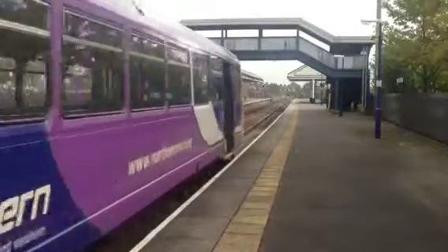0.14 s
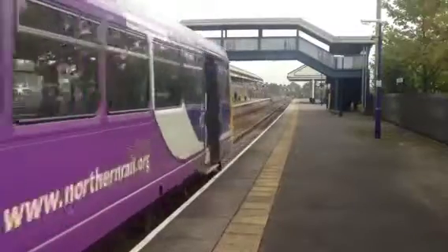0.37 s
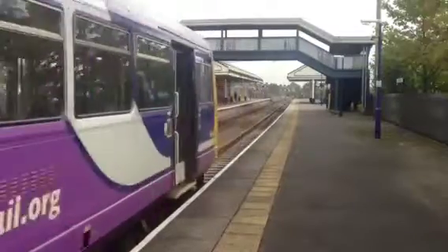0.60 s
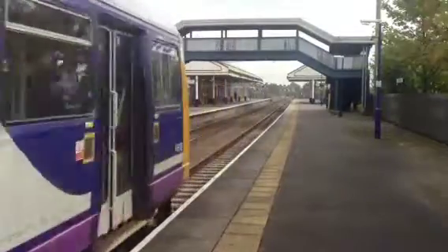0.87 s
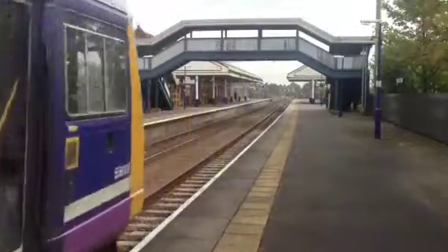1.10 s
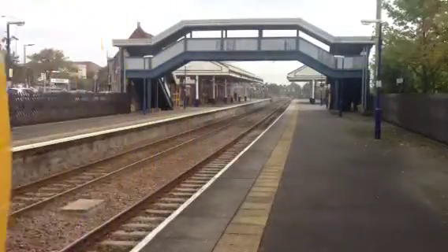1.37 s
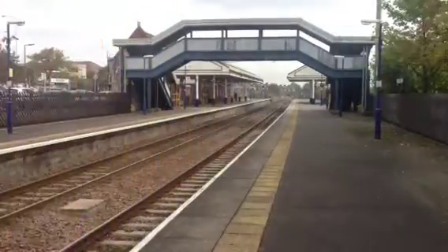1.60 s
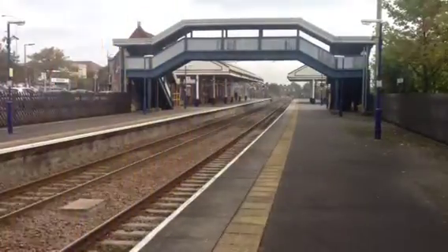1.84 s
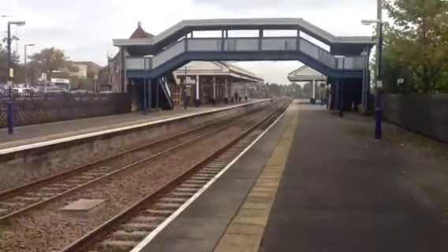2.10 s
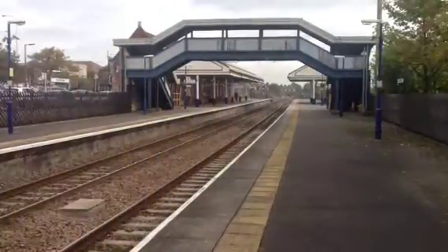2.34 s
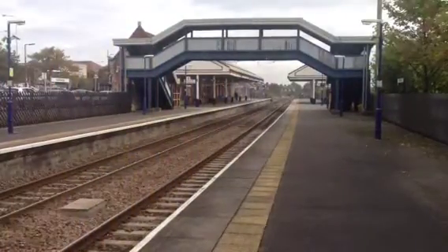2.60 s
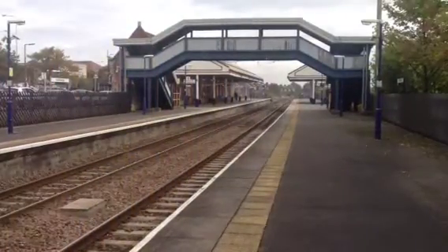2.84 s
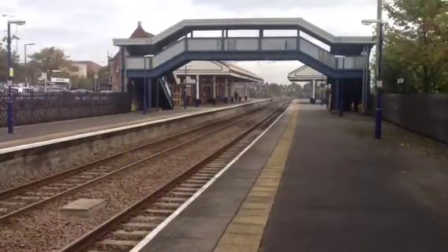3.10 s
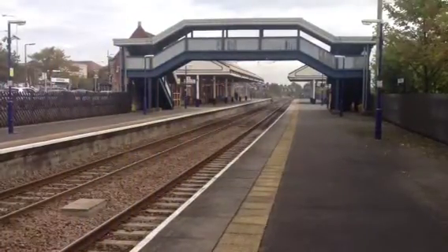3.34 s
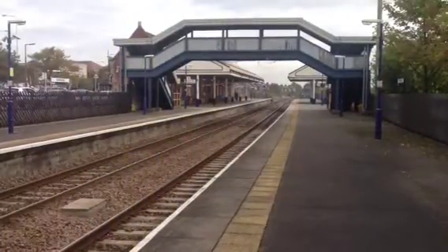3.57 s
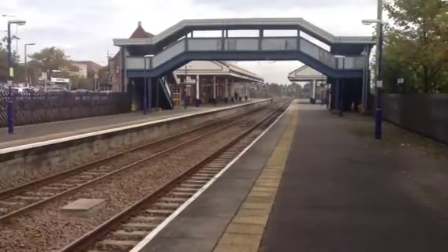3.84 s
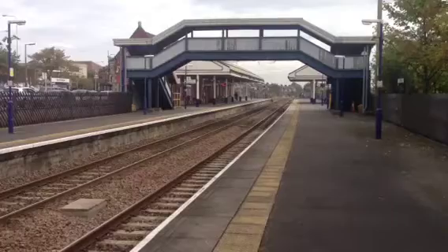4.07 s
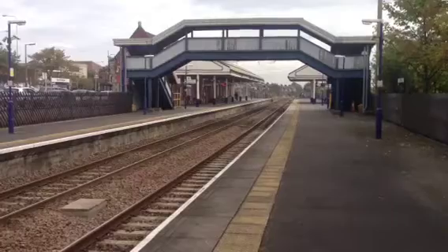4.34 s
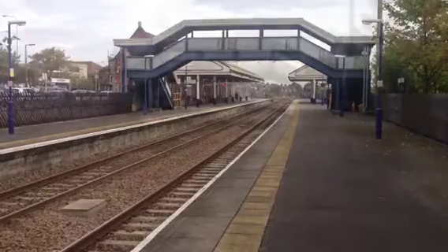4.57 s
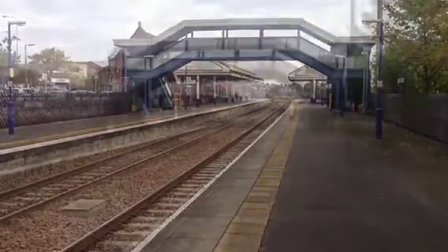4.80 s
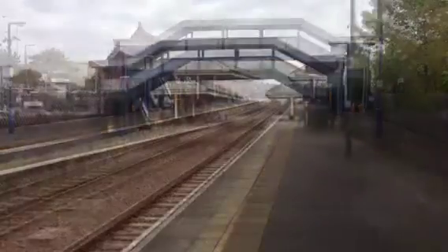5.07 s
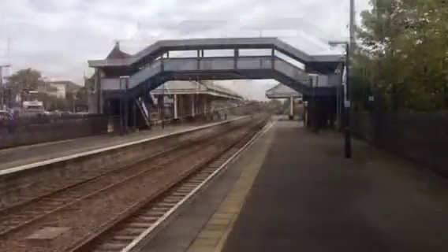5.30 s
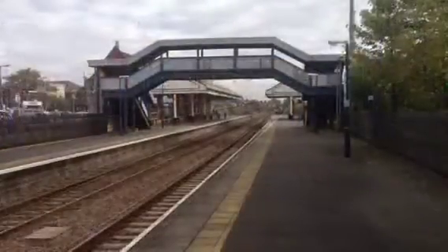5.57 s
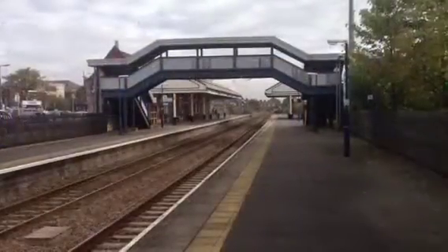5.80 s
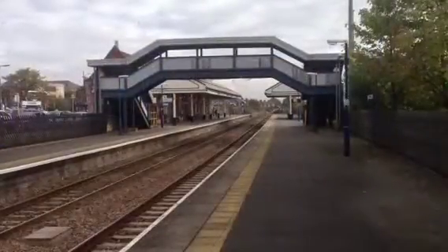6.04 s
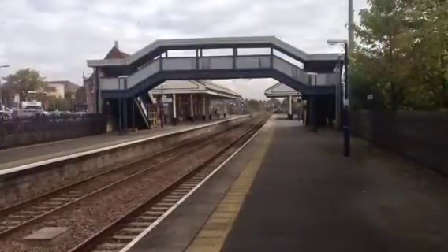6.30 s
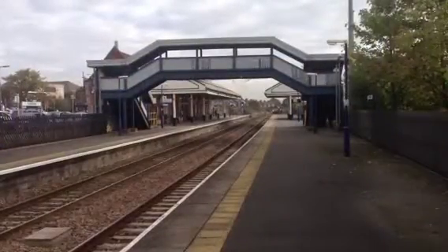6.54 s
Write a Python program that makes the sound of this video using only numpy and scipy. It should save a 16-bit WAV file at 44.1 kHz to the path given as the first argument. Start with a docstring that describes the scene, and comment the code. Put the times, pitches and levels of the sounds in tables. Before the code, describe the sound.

Outdoors on a station platform, a two-car diesel train passes right beside a handheld microphone: low throbbing engines, exhaust roar, wheels rushing and brief rough surges on the rails. It draws away, growing duller and softer. Near the end a loud soft-edged finger knock hits the device and the train stops instantly, leaving quiet air with faint handling ticks.

```python
"""A two-car diesel train passes a station platform and draws away: sines at falling firing rates make two engines
that hum a few hertz apart and beat; a gear line whines. Shaped noise makes exhaust roar, wheels on rail, fans and air.
A finger knocks the camera case (damped modes) and the train is cut off within milliseconds, leaving the quiet
station (soft noise) with faint ticks (damped sines) and a rustle of handling (noise swells)."""
import sys
import numpy as np
from scipy import signal
from scipy.fft import rfft, irfft, next_fast_len
from scipy.io import wavfile
from scipy.ndimage import uniform_filter1d, map_coordinates

SR = 44100
rng = np.random.default_rng(int(sys.argv[2]) if len(sys.argv) > 2 else 0)


def voltage_ratio(decibels):
    """Convert decibels (scalar or array-like) to amplitude ratios, 20 dB per decade."""
    exponent = np.asarray(decibels, float) / 20
    return 10 ** exponent


def store_wav(level_fs):
    """Save 16-bit WAV to argv[1]."""
    pcm = np.round(np.clip(np.atleast_2d(level_fs), -1, 1) * 32767)
    wavfile.write(sys.argv[1], SR, pcm.T.astype(np.int16))


N = 294147
T = np.arange(N) / SR


def unit(x):
    """Scale to rms 1."""
    return x / np.sqrt(np.mean(x ** 2) + 1e-20)


def curves(rows):
    """One value per sample for each column after the time."""
    t_s, *columns = np.transpose(rows)
    return [np.interp(T, t_s, column) for column in columns]


def wobble(knots_per_s):
    """Smooth random curve: spline through normal draws, at most 39 knots/s."""
    knots = rng.standard_normal(int(N * 40 / SR) + 4)
    return map_coordinates(knots, [T * min(knots_per_s, 39)])


def rush(spectrum, patchy_db):
    """Coloured noise of rms 1 with time-frequency patches of random gain."""
    z = signal.stft(rng.standard_normal(N), nperseg=1024)[2]
    patches = rng.standard_normal(z.shape)
    patches = uniform_filter1d(uniform_filter1d(patches, size=8, axis=0), size=8, axis=1)
    noise = signal.istft(z * voltage_ratio(patchy_db * unit(patches)), nperseg=1024)[1][:N]
    size = next_fast_len(N + 8192)
    hz, db = np.transpose(spectrum)
    bin_hz = np.fft.rfftfreq(size, 1 / SR)
    gain_db = np.interp(np.log(bin_hz + 1), np.log(hz + 1), db)
    return unit(irfft(rfft(noise, size) * voltage_ratio(gain_db), size)[:N])


def tone(hz, db, drift_rad, waver_db=0):
    """Sine of rms level db whose phase drifts and whose level wavers."""
    phase_rad = 2 * np.pi * np.cumsum(hz) / SR + drift_rad * wobble(6)
    return np.sqrt(2) * voltage_ratio(db + waver_db * wobble(5.11)) * np.sin(phase_rad)


def swells(rows):
    """Amplitude of summed Gaussian swells, rows (t/s, level/dB, half length/s)."""
    return sum(voltage_ratio(db) * np.exp(-((T - t_s) / half_s) ** 2) for t_s, db, half_s in rows)


# Air and far traffic: t/s, air level/dB, traffic level/dB
STATION_LEVELS = [(0, -75, -62), (4.4, -62, -50), (4.8, -43.5, -49), (5.4, -47, -58), (6.1, -47, -63),
                  (6.4, -46, -51.5), (6.67, -47, -60)]
# Spectra, relative: f/Hz, level/dB per Hz
AIR_SPECTRUM = [(100, -26), (170, -9.5), (257, -2), (669, -9), (721, -10.5), (763, -7), (807, -8.5),
                (1030, -7), (1130, -11.5), (1990, -12), (2780, -23), (4620, -26.5), (9600, -38),
                (12700, -46.5), (15100, -38)]
TRAFFIC_SPECTRUM = [(24, -60), (40, -30), (59, -4), (92, -10), (108, 1), (170, 2.5), (220, -28),
                    (370, -120)]
HISS_SPECTRUM = [(11800, -40), (12250, -3), (12400, 0), (12550, -3), (13000, -40)]
HISS_DB = -86


def station():
    """Broadband air and low far traffic, each shaped noise, and the thin high whine of the camera itself
    (narrow noise)."""
    air_db, traffic_db = curves(STATION_LEVELS)
    hiss = voltage_ratio(HISS_DB + 1.4 * wobble(12)) * rush(HISS_SPECTRUM, patchy_db=1)
    air = voltage_ratio(air_db + 0.26 * wobble(4.48)) * rush(AIR_SPECTRUM, patchy_db=1.0)
    traffic = voltage_ratio(traffic_db) * rush(TRAFFIC_SPECTRUM, patchy_db=1.0)
    return air + traffic + hiss


def ringing(t_s, db, hz, t60_s, attack_s):
    """One damped mode struck at t_s, with a gradual onset."""
    t = np.clip(T - t_s, 0, None)
    onset = (1 - np.exp(-t / attack_s)) ** 1.5
    return voltage_ratio(db - 60 * t / t60_s) * np.sin(2 * np.pi * hz * t) * onset


# Finger knock: t/s, level/dB
KNOCK = [(5.4092, -1)]
# Camera case modes: f/Hz, level/dB re knock, t60/s
CASE_MODES = [(465, 0, .017), (378, -13, .04), (176, -20, .065), (590, -18, .027)]
# Grip ticks: t/s, level/dB, f/Hz
TICKS = [(5.4964, -58, 12500), (5.5283, -46, 13000), (5.5707, -44, 13700), (5.5994, -48, 14000),
         (5.7354, -50, 11500), (5.7573, -50, 13100), (5.8344, -52, 14500), (6.0397, -40, 8460),
         (6.1983, -54, 8060), (6.4832, -42, 13000)]
TICK_T60_S = .002
# Grip shifts: t/s, level/dB, half length/s
RUSTLE = [(5.5, -72, .02), (5.59, -65, .03), (5.70, -76, .02), (5.76, -68, .035)]
# Rustle spectrum, relative: f/Hz, level/dB per Hz
RUSTLE_SPECTRUM = [(5000, -42), (7000, 2), (9000, -8), (12500, 0), (15200, -5)]


def handling():
    """A finger knocks the camera case, whose modes beat; the grip ticks and rustles faintly."""
    # a soft fingertip loads the case gradually
    knock = sum(ringing(t_s, db + mode_db, hz, t60_s, attack_s=.0017)
                for t_s, db in KNOCK for hz, mode_db, t60_s in CASE_MODES)
    ticks = sum(ringing(t_s, db, hz, TICK_T60_S, attack_s=.00003) for t_s, db, hz in TICKS)
    rustle = swells(RUSTLE) * voltage_ratio(2.5 * wobble(38)) * rush(RUSTLE_SPECTRUM, patchy_db=1.0)
    return knock + ticks + rustle


CAR_S, FRONT_CAR_DB = 1.72, -1.5  # front car: lead in time, level re rear car
FAR_S, FAR_FADE_DB_PER_S = 4, 2


def passing(t_s, db, reach_s, reach_in_s, fall_db, far_db):
    """Level/dB of one part on both cars: distance loss each way, plus the slow fade of the far train."""
    def car_power(at_s, peak_db):
        reach = np.where(T < at_s, reach_in_s, reach_s)
        return voltage_ratio(2 * peak_db - fall_db * np.log2(1 + ((T - at_s) / reach) ** 2))

    far_power = voltage_ratio(2 * (far_db - FAR_FADE_DB_PER_S * (T - FAR_S)))
    front_power = car_power(t_s - CAR_S, db + FRONT_CAR_DB)
    return 10 * np.log10(car_power(t_s, db) + front_power + far_power)


# Exhaust roar, pipe growl, body, rail, wheels, fans, air jet on the rear car: t/s of passing, level/dB there,
# time/s to travel its nearest distance, the same on the way in, loss/dB per doubling of distance,
# far-train level/dB at FAR_S
PARTS = [(.6, -22.5, 0.98, 1, 12.5, -45), (1.3, -30, .9, 0.78, 12, -51), (1.5, -26, 0.61, 1.1, 13.5, -43.5),
         (.8, -22, 0.83, 1.3, 14, -45), (.85, -19.5, 0.54, 0.74, 9.5, -43.5),
         (.85, -19.5, .36, 0.52, 10.5, -46.5), (.85, -27.5, 0.38, 0.63, 16, -62.5)]
# Spectra, relative: f/Hz, level/dB per Hz
EXHAUST_SPECTRUM = [(65, -33), (110, -12), (140, -7.5), (181, 0), (214, 5.5), (259, 2.5), (420, 0),
                    (550, -12), (920, -120)]
GROWL_SPECTRUM = [(330, -32), (420, -6), (480, 4), (540, 0), (680, -45)]
BODY_SPECTRUM = [(310, -51), (530, -4.5), (601, 0.5), (684, -4.5), (900, -6.5), (1170, -34), (1980, -120)]
RAIL_SPECTRUM = [(530, -22.5), (900, -8), (977, -6.5), (1150, 0.5), (1450, -9.5), (1880, -39), (3190, -120)]
WHEELS_NEAR_SPECTRUM = [(850, -52), (1450, -9.5), (1640, -8), (1810, -2.5), (2080, 1), (2290, -1),
                        (2700, -10), (3510, -16), (5940, -120)]
WHEELS_FAR_SPECTRUM = [(850, -29), (1450, -1), (1540, 2), (1810, -2), (2040, 1.5), (2700, -6), (3510, -52),
                       (5940, -120)]
FANS_NEAR_SPECTRUM = [(1590, -21), (2700, 0), (2960, -4.5), (3240, 1.5), (3590, -0.5), (4450, 0),
                      (4690, -1), (5070, -11.5), (5650, -5), (6660, -4.5), (8080, -6), (10500, -15.5),
                      (13600, -51), (22000, -120)]
FANS_FAR_SPECTRUM = [(1590, -36), (2700, -19), (2930, -2.5), (3190, 0.5), (3670, -3.5), (4340, -2),
                     (4960, -12), (5570, -6.5), (6210, -9), (7830, -7.5), (12500, -27), (16200, -56),
                     (22000, -120)]
JET_SPECTRUM = [(5000, -35), (8500, -3), (10200, -2), (11300, -8), (14000, -7), (15100, -10)]
# Close sound of wheels and fans: t/s, share 0-1
NEAR_SHARE = [(0, 0.2), (.4, 0.96), (1.1, 0.94), (1.6, 0.7), (2.2, 0.34), (3, 0.04), (5.43, 0.14)]
# Running-gear surges before each part's share: t/s, level/dB, half length/s
JOLTS = [(.17, 1.5, .03), (0.374, 1.5, 0.033), (0.711, 3.5, 0.024), (0.812, 4, 0.02), (.96, 0.5, 0.038),
         (1.603, 2, 0.028), (1.692, 3.5, 0.037), (1.822, 3.5, 0.081), (2.2, 2.5, 0.14), (2.443, 2, 0.07)]


def rolling():
    """Noise of exhaust, pipe, body, rail, wheels, fans and air jet, trembling partly together with ride and jolts."""
    ride, near = wobble(6.835), np.clip(curves(NEAR_SHARE)[0], 0, 1)
    jolt = sum(db * np.exp(-((T - t_s) / half_s) ** 2) for t_s, db, half_s in JOLTS)
    tremble = 0.26 + 0.52 * near

    def blend(near_spectrum, far_spectrum, patchy_db):
        close = np.sqrt(near) * rush(near_spectrum, patchy_db)
        return close + np.sqrt(1 - near) * rush(far_spectrum, patchy_db)

    noises = (rush(EXHAUST_SPECTRUM, patchy_db=2.0), rush(GROWL_SPECTRUM, patchy_db=1.5),
              rush(BODY_SPECTRUM, patchy_db=1.0), rush(RAIL_SPECTRUM, patchy_db=1.0),
              blend(WHEELS_NEAR_SPECTRUM, WHEELS_FAR_SPECTRUM, patchy_db=1.0),
              blend(FANS_NEAR_SPECTRUM, FANS_FAR_SPECTRUM, patchy_db=0.5), rush(JET_SPECTRUM, patchy_db=2.5))
    # per part, in the order of PARTS
    ride_shares = (0.35, 0.67, 0.68, 0.46, 0.57, 0.96, 0.81)
    own_shares = (1.0, 2.4, 0.43, 0.7, 0.32, 0.21, 0.57)
    jolt_shares = (0.54, 0.48, 0.53, 1.18, 0.48, 0.62, .4)
    out = 0
    for part, noise, ride_share, own_share, jolt_share in zip(PARTS, noises, ride_shares, own_shares, jolt_shares):
        shake_db = tremble * (ride_share * ride + own_share * wobble(12))
        out = out + voltage_ratio(passing(*part) + jolt_share * jolt + shake_db) * noise
    return out


# Firing rates as heard: t/s, rear exhaust f/Hz, rear engine block f/Hz, front exhaust f/Hz
FIRING = [(0, 99.3, 102.3, 92.6), (.3, 98.7, 101.9, 92.2), (.55, 98.2, 101, 91.9), (.8, 97.9, 99.7, 91.7),
          (1.1, 97.6, 98.4, 91.4), (1.5, 97.55, 97.7, 91.1), (2.3, 97.2, 97.2, 90.8),
          (3.5, 96.95, 96.95, 90.4), (5.43, 96.7, 96.7, 90.1)]
# Exhaust hums: t/s, rear level/dB, front firing order 1 level/dB, front order 2 level/dB, upper hum level/dB
EXHAUST_HUMS = [(0, -26.5, -42, -40, -36), (.3, -28, -36, -29, -46), (.42, -40, -46, -31, -46),
                (.6, -34, -46, -33, -54), (.74, -42, -45, -36.5, -53), (.9, -31.5, -41, -41, -57),
                (1.2, -44, -55, -58, -58), (1.5, -40, -55, -46, -58), (2.0, -41, -51, -46, -60),
                (2.9, -40.5, -51, -43.5, -55), (3.3, -45.5, -56, -50, -57.5), (3.55, -39.5, -46, -46, -49),
                (3.9, -50, -60, -49, -63), (4.3, -48, -53, -46.5, -49), (4.8, -48.5, -61, -41, -57),
                (5.1, -54, -54, -43.5, -62), (5.43, -52.5, -58, -43.5, -61)]
UPPER_HUM_HZ = 104.7
REAR_OCTAVE_DB, REAR_OCTAVE_FADE_DB_PER_S = -1, 1.5  # second firing order re first, duller with distance
# Rear block lines: multiples of the six-cylinder cycle rate, the last a gear mesh
BLOCK_ORDERS = (12, 13, 18, 20, 30, 36, 38, 70)
# Swells of each block line, in that order: t/s, level/dB, half length/s
BLOCK_SWELLS = [
    [(0, -28.5, 0.19), (.4, -34, .12), (.8, -27, 0.087), (1.45, -30.5, .15), (3.8, -48, .3),
     (4.5, -42.5, 0.16)],
    [(.5, -33, 0.18), (1.65, -31, 0.17), (4.2, -39, 0.13)],
    [(0, -27.5, .25), (.5, -32.5, 0.23), (1.05, -29, 0.14), (1.45, -34, .2), (2.3, -39, 0.49),
     (3.2, -45.5, 0.32)],
    [(0, -27, 0.16), (.92, -24, 0.22), (1.35, -36, .15)],
    [(1.15, -38, 0.34), (2.8, -37, 0.19)],
    [(.55, -31, 0.1), (1.25, -27.5, .3), (2.0, -31, 0.11), (3.3, -46.5, 0.24)],
    [(.45, -31.5, .15), (1.6, -26, .13), (2.1, -34.5, 0.24)],
    [(.37, -27, 0.15), (.8, -26, 0.071), (1.5, -33.5, 0.18), (1.8, -33.5, 0.16), (2.55, -39, 0.28),
     (3.3, -43, 0.32)],
]
BURIED_RE_ROAR_DB = -25  # block line between swells
# Unequal cylinders: multiple of the cycle rate, level/dB re exhaust roar
UNEVEN_ORDERS = [(9, -20), (11, -32), (14, -53.5), (15, -25), (16, -69), (17, -20), (19, -17), (22, -19.5),
                 (26, -14), (40, -21)]


def engines():
    """Exhaust hums of both cars, lines of the rear block and gears, weaker orders of unequal cylinders."""
    rear_hz, block_hz, front_hz = curves(FIRING)
    cycle_hz = block_hz / 6  # six firings a cycle
    rear_db, front_db, front_octave_db, upper_db = curves(EXHAUST_HUMS)
    rear_octave_db = rear_db + REAR_OCTAVE_DB - REAR_OCTAVE_FADE_DB_PER_S * T
    out = tone(rear_hz, rear_db, drift_rad=0.51, waver_db=2.5)
    out += tone(2 * rear_hz, rear_octave_db, drift_rad=0.24, waver_db=5)
    out += tone(front_hz, front_db, drift_rad=0.46, waver_db=3)
    out += tone(2 * front_hz, front_octave_db, drift_rad=.36, waver_db=1.5)
    out += tone(np.full(N, UPPER_HUM_HZ), upper_db, drift_rad=.36, waver_db=1.5)
    roar_db = passing(*PARTS[0])
    for order, rows in zip(BLOCK_ORDERS, BLOCK_SWELLS):
        level = swells(rows) + voltage_ratio(roar_db + BURIED_RE_ROAR_DB)
        out += level * tone(order * cycle_hz, 0, drift_rad=1.29, waver_db=3.5)
    for order, db in UNEVEN_ORDERS:
        out += tone(order * cycle_hz, roar_db + db, drift_rad=0.64, waver_db=4.5)
    return out


# Train cut-off: t/s, fade/s
CUT = (5.433, .004)


def scene():
    """Train until the cut, station and handling throughout, the same on both channels."""
    cut_s, fade_s = CUT
    train_gain = 1 / (1 + np.exp(np.clip((T - cut_s) / fade_s * 4, -40, 40)))
    mono = (engines() + rolling()) * train_gain + station() + handling()
    return np.tile(mono, (2, 1))


def top_cut(x):
    """Nothing passes above the cut-off."""
    return signal.sosfilt(signal.butter(12, 15210, fs=SR, output="sos"), x)


def record(dry):
    """The microphone loses the deepest bass: second-order high-pass."""
    low_cut = signal.butter(2, 71, "high", fs=SR, output="sos")  # Hz
    mix = signal.sosfilt(low_cut, dry)
    return top_cut(mix)


dry = scene()
out = record(dry)
store_wav(out)
```